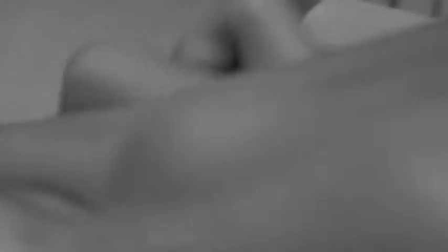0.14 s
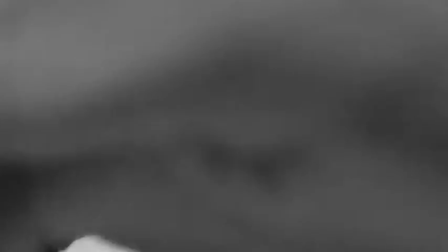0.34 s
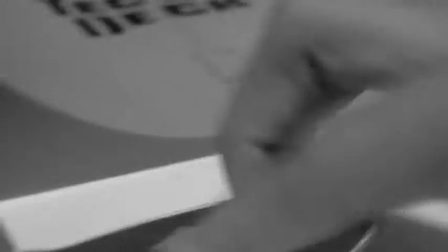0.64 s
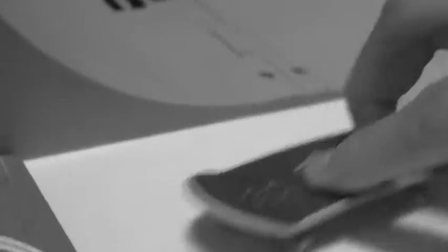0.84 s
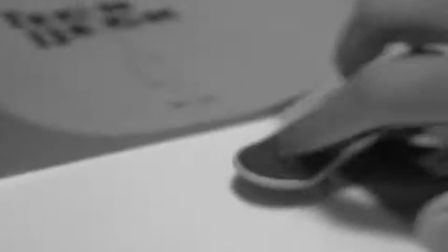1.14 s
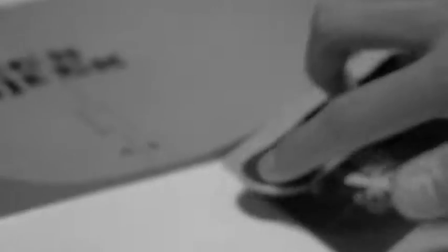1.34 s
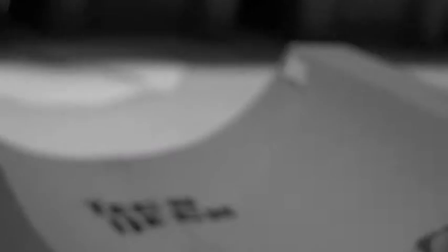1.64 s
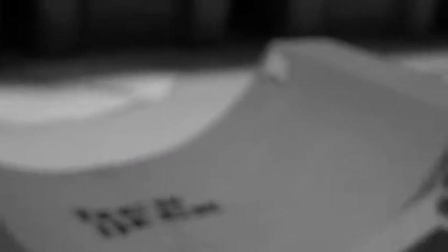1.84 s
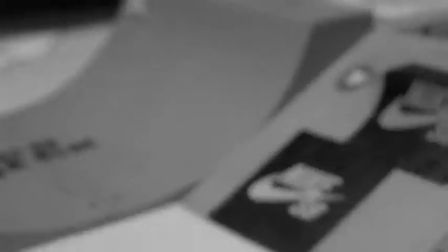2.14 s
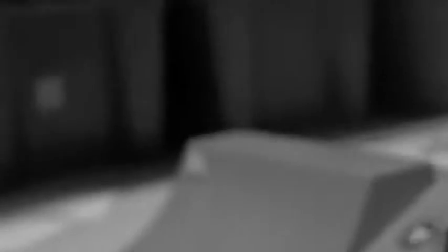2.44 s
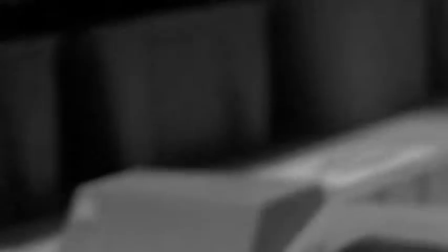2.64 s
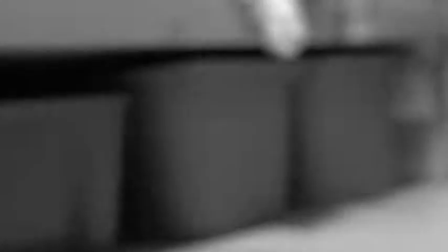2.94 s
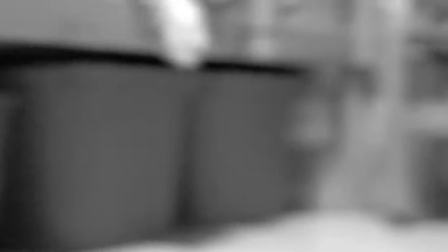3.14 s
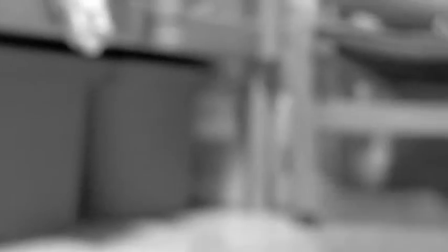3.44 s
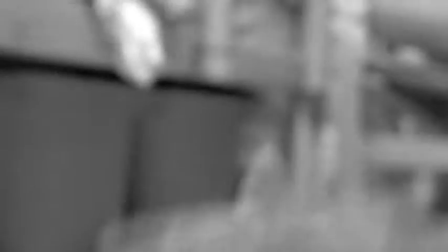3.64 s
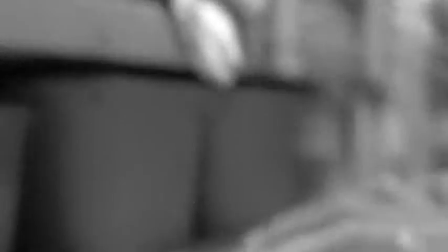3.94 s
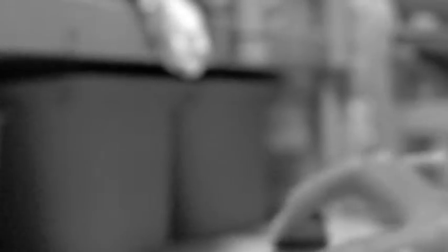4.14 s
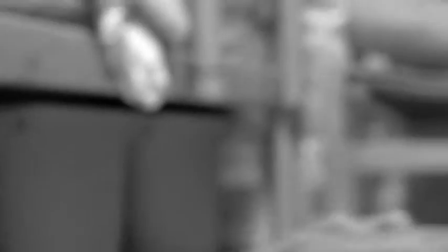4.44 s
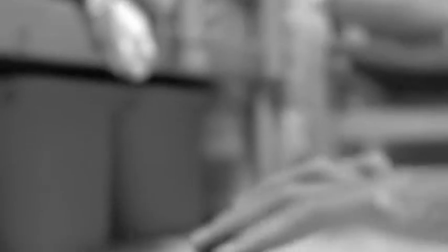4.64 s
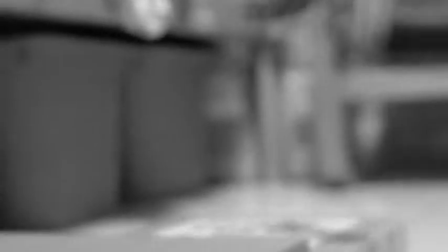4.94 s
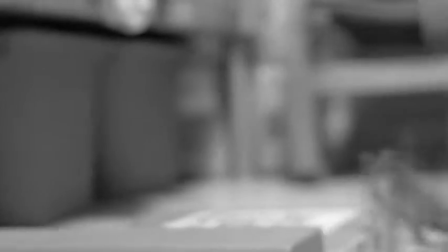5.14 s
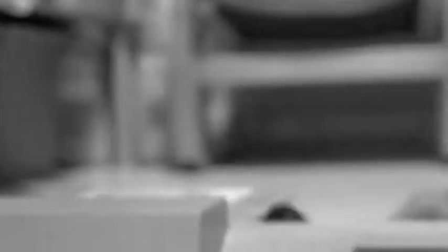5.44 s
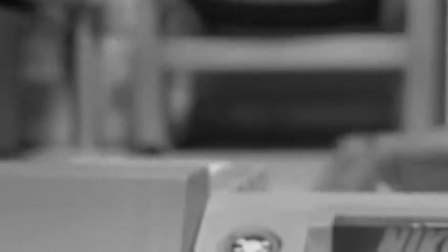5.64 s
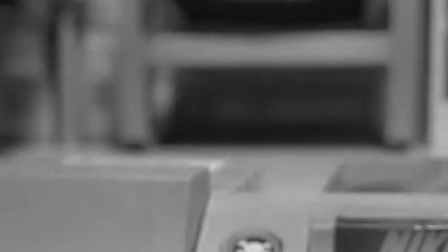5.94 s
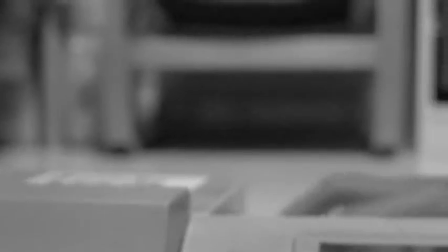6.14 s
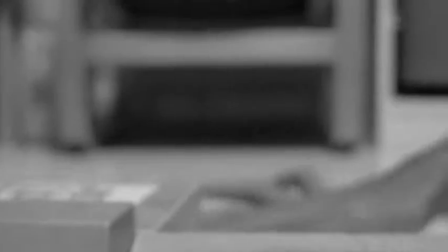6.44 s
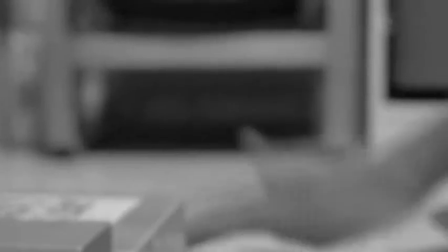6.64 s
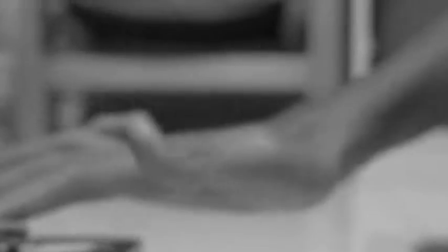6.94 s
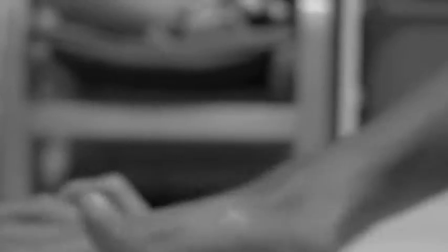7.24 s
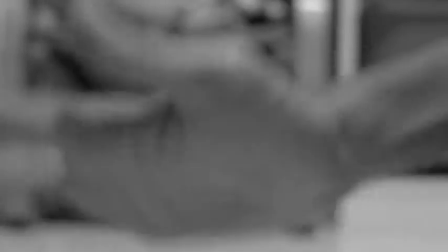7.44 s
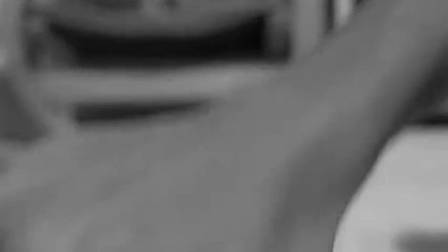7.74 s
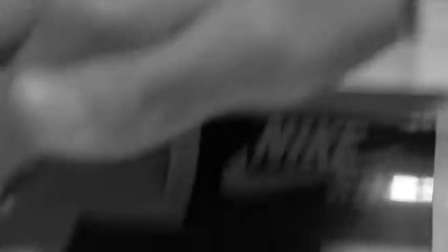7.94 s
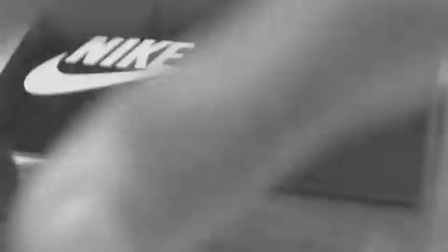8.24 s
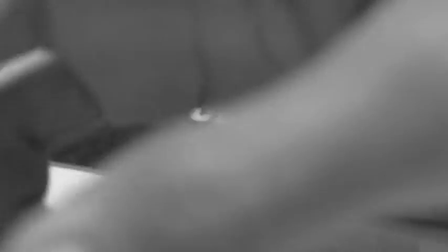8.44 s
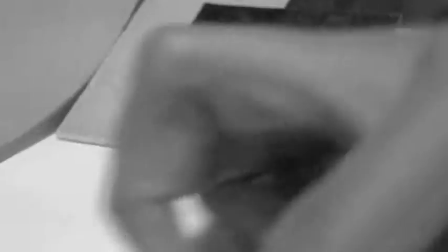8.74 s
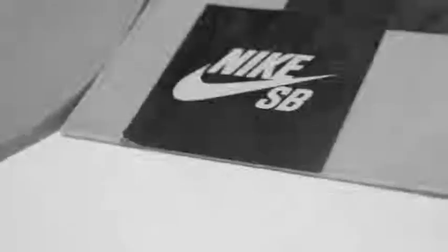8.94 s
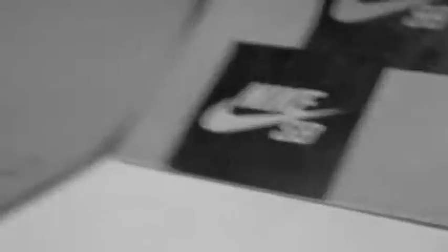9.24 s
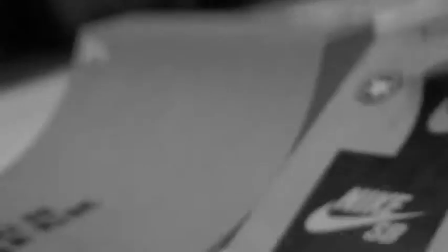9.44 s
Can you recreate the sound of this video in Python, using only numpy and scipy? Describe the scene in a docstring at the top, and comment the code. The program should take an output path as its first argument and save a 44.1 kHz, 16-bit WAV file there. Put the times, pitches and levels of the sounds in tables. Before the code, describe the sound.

A miniature skateboard worked by fingers starts with knocks and a sharp crack, then rolls grittily over a hollow plastic ramp with clicking landings. After a lull, dense hollow clacks come from a box, then another pause, one hard landing, a short roll and a flurry of woody knocks. It thins to faint ticks and rustle. Close stereo pickup, small room, soft low rumble and faint hiss.

```python
"""Fingerboard over ramp and box

A fingerboard rolls and flips over a hollow plastic ramp and a box on a hard floor in a small room.
Wheel bumps and landings excite ringing modes: hollow obstacles, wooden deck and metallic trucks.
Edges crack as short noise bursts and rattle out; skin and sleeve rustle as swelling noise strokes.
Underneath lie hand rumble, house bass with a mains hum, a mid wash and a faint hiss."""
import sys
import numpy as np
from scipy import signal
from scipy.fft import rfft, irfft, next_fast_len
from scipy.io import wavfile

SR = 44100
rng = np.random.default_rng(int(sys.argv[2]) if len(sys.argv) > 2 else 0)


def master_out(mix):
    """Clip the mix to full scale and print it as 16-bit PCM to the path in sys.argv[1]."""
    frames = np.transpose(np.atleast_2d(mix))
    ceiling = np.clip(frames, -1, 1)
    pcm = np.round(ceiling * 32767).astype(np.int16)
    wavfile.write(sys.argv[1], SR, pcm)


N = 423784
TIME = np.arange(N) / SR
PADDED = next_fast_len(N)
BINS_HZ = np.fft.rfftfreq(PADDED, 1 / SR) + 1   # the extra 1 Hz keeps the log axis finite

# Room noise, base level that its layers are set against: (time [s], level [dB])
ROOM_LEVEL = [(0.0, -65), (1.74, -61), (2.11, -55.5), (2.33, -57), (3.32, -53.5), (3.42, -54.5),
              (3.69, -62), (4.63, -57), (5.19, -65.5), (5.49, -65.5), (6.61, -60.5), (6.8, -60),
              (6.93, -63), (7.04, -74), (7.76, -67.5), (8.46, -68), (8.73, -65.5), (9.61, -63)]
BASS_DB, MIDDLE_DB, AIR_DB, AIR_TREBLE_DB, GRIP_DB = 4, 6, -12.5, -6, -12   # against that base
# Spectra of hand rumble, house bass and mid wash: (frequency [Hz], level per Hz [dB])
HANDLING_SPECTRUM = [(15, -45), (28, -18.5), (45, -5.5), (58, -2), (75, -13.5), (110, -34), (200, -75.5)]
BASS_SPECTRUM = [(47, -37), (80, -1.5), (108, -1), (167, -8), (195, 0.5), (222, -5.5), (266, -4.5),
                 (339, -3.5), (450, -19.5), (580, -46.5), (990, -120)]
MIDDLE_SPECTRUM = [(210, -40.5), (350, 0), (460, 2.5), (700, 1.5), (1080, 2), (1400, -2.5), (1800, -3.5),
                   (2050, -10), (2900, -14.5), (3500, -23), (5000, -61.5)]
# Stereo width of room noise and rustle: (frequency [Hz], left-right likeness [-1 to 1])
LIKENESS = [(30, -0.84), (60, -0.85), (150, 0.013), (380, -0.67), (950, 0.4), (2380, 1), (5980, -0.21),
            (15000, 0.12)]
MAINS_HZ, MAINS_DB = 100.3, -8.5   # level against the house bass
# Shifts of the holding hand: (time [s], rumble level [dB])
SHIFTS = [(.96, -73), (2.14, -83), (2.55, -74), (3.15, -74), (4.52, -100), (4.95, -52.5), (5.4, -68),
          (6.02, -84), (6.502, -57.5), (8.699, -70.5), (9.15, -71)]
SHIFT_S = 0.12   # swell and fade
HISS_DB, CUTOFF_HZ = -88, 17000   # microphone self-noise; top cut

# Spectrum of the rustle: (frequency [Hz], level per Hz [dB])
RUSTLE_SPECTRUM = [(1500, -26), (2400, -7), (3200, -3), (4300, 0), (6100, -4), (8000, -6), (10500, -4),
                   (13500, -8), (15800, -13), (16600, -30)]
# Strokes of skin and sleeve: (full from [s], held for [s], level below 6 kHz [dB], level above [dB])
STROKES = [(0, 0.29, -50.5, -82), (0.832, 0.27, -52, -68), (1.432, 0.16, -56, -64.5),
           (2.0, 0.05, -59, -48.5), (2.303, 0.58, -59, -61.5), (3.29, 0.16, -50.5, -43.5),
           (4.343, 0.078, -57.5, -65), (4.745, 0.057, -55.5, -55), (5.301, 0.038, -59.5, -64.5),
           (5.772, 0.48, -59, -58), (6.644, 0.057, -50, -56.5), (7.332, 0.11, -57.5, -60.5),
           (7.83, 0.033, -60.5, -57), (9, 0.39, -81, -66)]
STROKE_RISE_DB_PER_S, STROKE_FALL_DB_PER_S = 154, 97.5
GRAIN_DB = -5   # ticks of grit in the rustle

# Reverb of the small room
ROOM_T60_S, ROOM_DB, ROOM_BASS_HZ, ROOM_TREBLE_HZ = 0.17, -9, 670, 8900

# Blows, relative levels: (time [s], crack below 7 kHz [dB], crack above 7 kHz [dB],
# trucks [dB], deck [dB], hollow obstacle [dB], rattle t60 [s])
BLOWS = [(0.0136, -25, -65, -30, -22, -37, 0.038), (0.144, -33, -57, -52, -51, -23, 0.031),
         (0.165, -26.5, -54, -57, -55, -18, 0.044), (0.3147, -38, -60, -43, -56, -72, 0.059),
         (0.375, -9.5, -14.5, -18.5, -8, -30, 0.027), (0.628, -46, -65, -62, -36.5, -68, 0.039),
         (0.6625, -26, -52, -62, -58, -66, 0.014), (0.6979, -19.5, -13, -41, -26, -72, 0.015),
         (0.804, -40, -73, -63, -64, -66, 0.2), (0.916, -31.5, -60, -61, -65, -61, 0.037),
         (1.014, -24.5, -49, -31, -29, -19.5, 0.037), (1.0241, -32.5, -51, -36, -40, -14.5, 0.13),
         (1.0924, -35, -64, -26, -40, -34, 0.12), (1.2056, -51, -40.5, -31, -34, -24.5, 0.17),
         (1.3156, -25.5, -59, -17.5, -21, -15.5, 0.034), (1.3505, -32, -51, -31, -35, -25.5, 0.036),
         (1.4481, -24, -56, -30, -27, -19, .04), (1.4995, -27.5, -58, -24, -29, -15, 0.074),
         (1.5474, -37, -53, -20, -51, -42, 0.06), (1.7256, -36, -45, -32, -26, -27, 0.044),
         (1.7753, -21, -22, -26, -45, -60, 0.033), (1.8492, -40, -54, -40, -29, -16, 0.077),
         (1.8764, -42, -44, -27, -42, -29, 0.12), (1.9937, -31, -55, -22.5, -39, -18, 0.17),
         (2.0628, -12.5, -8.5, -8, -37, -16, 0.041), (2.1955, -8.5, -11.5, -25, -24.5, -36, 0.045),
         (2.2095, -29, -10.5, -43, -48, -36, 0.045), (2.2244, -17, -45, -47, -39, -46, 0.16),
         (2.239, -31, -6.5, -25, -29, -54, 0.052), (2.384, -40, -42, -43, -54, -52, 0.13),
         (2.9817, -43, -43.5, -53, -49, -62, 0.24), (3.0388, -40.5, -32, -63, -51, -55, 0.11),
         (3.2736, -10.5, -43, -15, -36, -63, 0.019), (3.489, -11, 8, -45, -59, -72, 0.012),
         (3.6562, -12, -9.5, -20, -30, -9, 0.12), (3.6656, -24, -17, -13, -25, -5.5, 0.042),
         (3.7023, -10, -19, -15, -25, -2.5, 0.065), (3.7384, -32.5, -33, -46, -36, -15, 0.13),
         (3.8538, -31.5, -57, -23.5, -49, -30.5, 0.16), (3.9662, -18, -58, -21, -43, -13.5, 0.058),
         (4.171, -46, -64, -34, -42, -31, 0.049), (4.3156, -19, -15, -28, -30, -4, 0.059),
         (4.323, -22.5, -37, -23, -32, -9, 0.16), (4.356, -40, -41, -36, -43, -8, .05),
         (4.3753, -33, -38, -27, -42, -11, 0.071), (4.4431, -32, -66, -66, -51, -41, 0.035),
         (4.501, -38.5, -49, -50, -46, -26.5, 0.13), (4.5794, -41, -50.5, -33, -44, -15.5, 0.12),
         (4.6033, -40, -56, -30.5, -62, -19, 0.054), (4.6925, -20.5, -24, -27, -22, -4, 0.066),
         (4.7097, -27, -45, -24.5, -45, -44, .059), (4.7933, -25, -42, -34, -22, -26, 0.071),
         (4.85, -32, -32, -19, -18, -13, 0.24), (4.8741, -10, -0.5, -13, -39, -10.5, 0.029),
         (5.1622, -7.5, -10.5, -6.5, -6, -6, 0.053), (5.1718, -32, -31, -14, -9, -17, 0.11),
         (5.1928, -13, -31, -5, -17, -5.5, 0.046), (5.218, -22.5, -19, -35, -21, -14, 0.12),
         (5.2839, -22.5, -13, -33, -44, -35, 0.073), (5.303, -20, -20, -33, -33, -17, 0.17),
         (5.5961, -32.5, -40, -21, -42, -25.5, 0.12), (5.699, -30, -20, -21, -32, -34.5, 0.025),
         (5.7805, -19, -19, -47, -46, -36, 0.037), (5.8333, -33, -32, -60, -47, -55, .071),
         (5.863, -22, -35, -33, -49, -63.5, 0.032), (6.7189, -19.5, -8.5, -33, -36, -38.5, 0.048),
         (6.731, -34, -21, -65, -58, -73, 0.16), (6.9197, -8.5, -5.5, -4, -4.5, 0, 0.045),
         (6.9339, -10.5, -30, -14, -22, -3, 0.038), (7.0665, -50.5, -48, -32.5, -34, -43, 0.087),
         (7.2682, -26, -45, -33, -32, -23, 0.081), (7.362, -31, -67, -45, -27, -35, 0.13),
         (7.4288, -45, -57, -40, -48, -51, 0.087), (7.4747, -25, -36, -39, -23, -17, 0.059),
         (7.5941, -22, -37, -21.5, -23, -26, 0.047), (7.69, -10.5, -23, -17.5, -16, -11.5, 0.086),
         (7.7109, -2, -11.5, -50, -17, -8, 0.023), (7.774, -12.5, -37, -18, -26, -31, 0.049),
         (7.8027, -34, -45, -17, -46, -54, 0.021), (7.8422, -10, -29, -20, -2, -45, 0.027),
         (7.87, -19.5, -43, -15, -18, -49, .033), (7.8857, -40, -35, -37, -16, -54, .054),
         (7.979, -16, -53, -26, -19.5, -58, 0.015), (8.0656, -25.5, -58, -22, -19, -72, .017),
         (8.309, -46.5, -62, -48, -56, -77, 0.033), (8.3728, -43, -59, -39, -46.5, -73, 0.03),
         (8.719, -56, -48, -41.5, -46, -79, 0.03), (9.0527, -54.5, -56, -43.5, -38, -42, 0.072),
         (9.0944, -59, -41, -38.5, -70, -60, 0.054), (9.1344, -57, -42.5, -53.5, -45, -49, .05),
         (9.177, -53, -67, -38.5, -57, -61, 0.027), (9.489, -34.5, -36.5, -70, -71, -70, 0.04)]
# Runs of the wheels, one list a run: (time [s], pressure on the wheels as relative level [dB])
RUNS = [
    [(0.0, -17.5), (0.02, -25), (0.036, -33), (0.124, -29.5), (0.144, -30.5), (0.198, -41), (0.206, -46),
     (0.26, -60)],
    [(1.0, -54), (1.016, -22), (1.026, -24.5), (1.09, -35), (1.142, -32), (1.186, -41.5), (1.212, -30),
     (1.3, -55.5)],
    [(1.3, -36), (1.32, -23.5), (1.41, -35), (1.518, -25.5), (1.534, -30), (1.546, -31), (1.696, -29),
     (1.7, -25)],
    [(1.7, -22), (1.732, -25.5), (1.77, -34.5), (2.006, -24), (2.058, -25.5), (2.066, -20.5), (2.138, -43),
     (2.19, -37.5)],
    [(3.2, -52), (3.266, -35.5), (3.274, -33), (3.284, -50), (3.312, -41.5), (3.348, -41), (3.402, -37.5),
     (3.48, -43)],
    [(3.72, -14), (3.76, -38), (3.798, -55), (3.842, -40), (3.87, -27), (3.96, -47)],
    [(3.98, -46), (3.996, -33), (4.06, -42.5), (4.074, -31.5), (4.138, -57), (4.184, -43), (4.208, -50),
     (4.31, -31)],
    [(4.39, -26), (4.42, -29), (4.434, -25), (4.452, -30.5), (4.572, -44.5), (4.58, -28), (4.686, -28.5),
     (4.69, -23)],
    [(4.72, -22), (4.726, -18), (4.796, -14), (4.842, -32), (4.85, -9.5), (4.884, -10.5), (4.894, -38),
     (4.96, -41.5)],
    [(5.22, -23.5), (5.236, -29), (5.29, -38), (5.296, -51), (5.32, -23.5), (5.348, -49), (5.354, -35.5),
     (5.5, -66)],
    [(5.6, -36), (5.68, -52), (5.704, -33), (5.766, -67), (5.782, -40), (5.804, -58), (5.872, -51),
     (5.92, -65)],
    [(6.96, -32), (7.016, -46), (7.058, -70), (7.068, -45.5), (7.132, -42.5), (7.144, -51.5), (7.19, -39),
     (7.23, -77.5)],
    [(7.23, -71), (7.234, -54), (7.278, -37), (7.286, -36.5), (7.35, -25), (7.448, -49.5), (7.478, -29),
     (7.58, -83)],
    [(7.72, -27), (7.734, -33), (7.768, -43), (7.778, -45), (7.836, -61), (7.84, -29.5)],
    [(7.88, -41), (7.888, -32), (7.956, -58), (7.982, -22.5), (8.062, -45), (8.068, -32), (8.082, -53.5),
     (8.16, -75)],
]
# What sounds in each run, against its pressure: (box [dB], ramp [dB], deck buzz [dB], truck rasp [dB])
RUN_COLOUR = [(-4.5, -2.5, -8, -13), (-3, -1, -4, -11), (-12, -1, -10.5, -9), (-14, 1, -13.5, -11),
              (-13, -13.5, -8, -0.5), (-0.5, -3.5, -14, -16), (1, -6, -16, -16), (0, -21, -15, -21.5),
              (-6.5, -12, -19.5, -15.5), (-2, -4.5, -29, -7.5), (-9.5, -7.5, -19, -8.5),
              (-3, -5.5, -29.5, -24.5), (-3.5, -2.5, -11.5, -12), (3.5, -1.5, -9, -15.5),
              (-30.5, -23, 2, -17)]
# While blows land on the box, not the ramp: (from [s], to [s])
ON_BOX = [(3.66, 5.0), (6.8, 6.93), (7.0, 7.55)]
# Where the board is in the stereo field: (time [s], left over right [dB])
PLACE = [(0, -2.5), (.38, 9.5), (.6, -1), (1.5, -2.5), (2.3, -1.5), (3.27, 5), (3.49, -5), (3.66, 1.5),
         (4.0, -1), (5.2, -2), (6.7, 0), (6.95, 3), (7.7, 2.5), (8.1, 7), (8.7, -4), (9.1, -8), (9.61, -1)]
# Ringing modes of each body: (frequency [Hz], relative level [dB], t60 [s])
RAMP_MODES = [(248, 1.5, 0.015), (395.3, -4.5, 0.07), (440, -2.5, 0.064), (506.7, -3.5, 0.081),
              (527, 0, 0.043), (626.5, 0, 0.052), (743, -28.5, 0.15)]
BOX_MODES = [(250, -10, 0.082), (338, -13, 0.15), (388.1, 1.5, 0.061), (434.4, -2, 0.065),
             (476.7, -10.5, 0.13), (540.6, -6, 0.065), (704, -14.5, 0.13)]
DECK_MODES = [(723, -2.5, 0.024), (861, -4.5, 0.035), (921, -8, 0.061), (991, -5.5, 0.046),
              (1092, -8.5, 0.035), (1204, 2.5, .006)]
TRUCK_MODES = [(1152, -10.5, 0.029), (1417.6, -4.5, 0.034), (1710, -3.5, 0.022), (1970, 2.5, 0.0073),
               (2283, -1.5, 0.018), (2730, -5, 0.007), (3580, -6.5, 0.0043), (4290, -5, 0.0073)]
# Surface under the obstacles: (frequency [Hz], relative level [dB], t60 [s])
TABLE_MODES = [(150.4, -7.5, 0.036), (207.4, 0, 0.0607), (288, 2, 0.08)]
TABLE_DB = -22   # against the hollow obstacle
# A soft, lower hollow knock: (frequency [Hz], relative level [dB], t60 [s])
THUMP_MODES = [(353, 2.5, 0.12), (678, -7.5, 0.051), (1020, -13, 0.045)]
THUMP_S, THUMP_DB = 9.575, -24
# Air under the ramp and in the box: (frequency [Hz], width [Hz])
RAMP_CAVITY = (575, 340)
BOX_CAVITY = (415, 190)
SMALL_BODY_HZ = 214   # below this the little objects hardly radiate
WHEEL_TURNS_PER_S = 42   # centre of a wandering speed

# Spectrum of the edge cracks: (frequency [Hz], level per Hz [dB])
CRACK_SPECTRUM = [(900, -41), (1800, -3.5), (3000, -0.5), (4400, 1), (6500, -2.5), (9500, -1), (13000, -1),
                  (15500, -3.5), (16500, -36)]
SNAP_T60_S = 0.0045
RATTLE_DB, RATTLE_DB_PER_OCTAVE = -8.5, 2   # against the crack at t60 50 ms; longer rattles start stronger
EDGE_SCATTER_DB = 3.0   # each edge faces the two sides a little differently
PORT_LAG = 0.24   # delay of the farther side [samples per dB of pan]


def amp(db):
    """Gain of a level in dB."""
    return 10 ** (np.asarray(db) / 20)


def rms_one(x):
    """Scale to rms 1."""
    return x / np.sqrt(np.mean(x ** 2) + 1e-20)


def in_time(rows):
    """Draw the second column of a curve, sample by sample."""
    s, value = np.transpose(rows)
    return np.interp(TIME, s, value)


def at_hz(points, hz):
    """Read a spectrum on a log frequency axis."""
    points_hz, value = np.transpose(points)
    return np.interp(np.log(hz), np.log(points_hz), value)


def coloured(x, spectrum, share=1):
    """Give noise or clicks a smooth spectrum."""
    gain = amp(at_hz(spectrum, BINS_HZ)) * share
    return irfft(rfft(x, PADDED) * gain, PADDED)[..., :N]


def drift(rate_hz):
    """Slow random wander of spread 1: lowpassed noise, made at a twentieth of the sample rate."""
    r = np.exp(-40 * np.pi * rate_hz / SR)
    noise = rng.standard_normal(N // 20 + 2002)
    slow = signal.lfilter([1], [1, -2 * r, r * r], noise)[2000:]
    return np.interp(np.arange(N) / 20, np.arange(len(slow)), rms_one(slow))


def grains(per_s, spread_db):
    """Random clicks of uneven size and sign, rms 1."""
    sizes = amp(spread_db * np.minimum(rng.exponential(1, N), 4))
    sizes *= rng.choice([-1, 1], N)
    return rms_one(sizes * (rng.random(N) < per_s / SR))


def panned(x, pan_db):
    """Left and right of one source."""
    return np.array([x * amp(pan_db / 2), x * amp(-pan_db / 2)])


def filtered(x, order, edge_hz, kind):
    """Butterworth filter."""
    return signal.sosfilt(signal.butter(order, edge_hz, kind, fs=SR, output="sos"), x)


def halves(x, split_hz):
    """Low and high part, rms 1 each; the inverted high part avoids a notch where they meet."""
    low, high = filtered(x, 2, split_hz, "low"), filtered(x, 2, split_hz, "high")
    return rms_one(low), -rms_one(high)


def wide_noise(spectrum, roughness_db):
    """Stereo noise whose likeness follows pitch; its mid part has rms 1 before the level flickers."""
    alike = np.clip(at_hz(LIKENESS, BINS_HZ), -.99, .99)
    share = np.sqrt([1 + alike, 1 - alike])
    mid, side = coloured(rng.standard_normal((2, N)), spectrum, share)
    flicker = amp(roughness_db * drift(15))
    return np.array([mid + side, mid - side]) * flicker / np.sqrt(np.mean(mid ** 2))


def ring(force, hz, t60):
    """Two-pole resonator: a unit click sets a sine of about height 1 ringing and dying."""
    r, w = amp(-60 / (t60 * SR)), 2 * np.pi * hz / SR
    return signal.lfilter([0, np.sin(w)], [1, -2 * r * np.cos(w), r * r], force + 1e-18)


def cavity(x, hz, width_hz):
    """A broad air resonance, gain 1 on top: the thump swells over a few cycles."""
    r = np.exp(-np.pi * width_hz / SR)
    feedback = [1, -2 * r * np.cos(2 * np.pi * hz / SR), r * r]
    return signal.lfilter(np.array([1, 0, -1]) * (1 - r * r) / 2, feedback, x + 1e-18)


def struck(modes, level_db, contact_s, scatter_db):
    """Every blow pushes each mode with a strength of its own; a longer contact is a softer push."""
    at = (np.array(BLOWS)[:, 0] * SR).astype(int)
    share = amp(np.array(modes)[:, 1])
    luck = amp(scatter_db * rng.standard_normal((len(at), len(modes))))
    # the colour varies from blow to blow, the strength stays
    luck *= np.sqrt(np.sum(share ** 2) / np.sum((share * luck) ** 2, axis=1, keepdims=True))
    out = np.zeros(N)
    for k, (hz, db, t60) in enumerate(modes):
        force = np.zeros(N)
        force[at] = amp(level_db + db) * luck[:, k] * (-1) ** k
        out += ring(force, hz, t60)
    push = np.hanning(int(contact_s * SR) + 3)
    return np.convolve(out, push / push.sum())[:N]


def rolled(modes, force, steady_force):
    """Wheel bumps through the modes of a body, scaled so that the steady force gives rms 1."""
    both = np.array([force, steady_force])
    out, steady = sum(amp(db) * ring(both, hz, t60) * (-1) ** k
                      for k, (hz, db, t60) in enumerate(modes))
    return out / np.sqrt(np.mean(steady ** 2))


def room_noise():
    """Lumpy rumble of the holding hand, house bass with a mains hum, and a mid wash."""
    room_db = in_time(ROOM_LEVEL)
    hum = amp(MAINS_DB + 3.0 * drift(4)) * np.sin(2 * np.pi * MAINS_HZ * TIME)
    bass = (wide_noise(BASS_SPECTRUM, roughness_db=0.5) + hum) * amp(room_db + BASS_DB)
    grip = amp(room_db + GRIP_DB)
    for s, db in SHIFTS:
        grip += amp(db) * np.exp(-((TIME - s) / SHIFT_S) ** 2)
    rumble = wide_noise(HANDLING_SPECTRUM, roughness_db=3.0) * grip
    middle = wide_noise(MIDDLE_SPECTRUM, roughness_db=1.15) * amp(room_db + MIDDLE_DB)
    return rumble + bass + middle


def room(x):
    """Dense reflections, unlike in each ear, starting after a few milliseconds; weak in bass and top."""
    t = np.arange(int(.5 * SR)) / SR
    fade = amp(-60 * t / ROOM_T60_S) * np.clip(t / 0.0028 - .5, 0, 1)
    echo = filtered(rng.standard_normal((2, len(t))) * fade, 1, [ROOM_BASS_HZ, ROOM_TREBLE_HZ], "band")
    echo *= amp(ROOM_DB) / np.sqrt(np.sum(echo ** 2, axis=1, keepdims=True))
    return signal.fftconvolve(x[None], echo, axes=1)[:, :N]


def rustle():
    """Skin and sleeve slide over grip tape and floor, noise with gritty ticks; a faint room hiss below."""
    ticks = rms_one(coloured(grains(250, spread_db=4.5), RUSTLE_SPECTRUM))
    slide = wide_noise(RUSTLE_SPECTRUM, roughness_db=1.5) + amp(GRAIN_DB) * ticks
    low, high = halves(slide, 6000)
    room_db = in_time(ROOM_LEVEL)
    low_gain, high_gain = amp(room_db + AIR_DB), amp(room_db + AIR_TREBLE_DB)
    for s, length, low_db, high_db in STROKES:
        rise_db = (TIME - s) * STROKE_RISE_DB_PER_S
        fall_db = (s + length - TIME) * STROKE_FALL_DB_PER_S
        shape = amp(np.minimum(0, np.minimum(rise_db, fall_db)))
        low_gain += amp(low_db) * shape
        high_gain += amp(high_db) * shape
    return low * low_gain + high * high_gain


def runs():
    """Gain of each rolling layer (box, ramp, deck, trucks); silent between runs."""
    total = np.zeros((4, N))
    for run, colour_db in zip(RUNS, RUN_COLOUR):
        s, pressure_db = np.transpose(run)
        total += np.outer(amp(colour_db), amp(np.interp(TIME, s, pressure_db, -200, -200)))
    return total


def flat_spots():
    """One bump a wheel turn, at a wandering speed; rms 1."""
    speed = WHEEL_TURNS_PER_S * amp(1.2 * drift(5.6))
    turns = np.floor(np.cumsum(speed) / SR)
    return rms_one(np.diff(turns, prepend=0) * amp(2.1 * rng.standard_normal(N)))


def jangle(level_db):
    """Envelope of the loose chatter that follows each blow: a quick swell, then a decay."""
    out, after = np.zeros(N), np.arange(int(.2 * SR)) / SR
    for (s, *_, t60), db in zip(BLOWS, level_db):
        i = int(s * SR)
        chatter = amp(db - 60 * after / t60) * np.minimum(after / 0.0036, 1)
        out[i:i + len(after)] += chatter[:N - i]
    return out


def table_thud():
    """The surface under the obstacles answers each blow with low, short modes."""
    hollow_db = np.array(BLOWS)[:, 5]
    return struck(TABLE_MODES, hollow_db + TABLE_DB, .002, scatter_db=2.5)


def hollow_thump():
    """One click rings a few hollow modes, each swelling through an air resonance."""
    knock = amp(THUMP_DB) * (np.arange(N) == int(THUMP_S * SR))
    return sum(cavity(ring(knock * amp(db), hz, t60), hz, 96) for hz, db, t60 in THUMP_MODES)


def obstacles(box_gain, ramp_gain):
    """Hollow ramp and box, struck and rolled on, each heard through the resonance of its air."""
    s, hollow_db = np.array(BLOWS)[:, 0], np.array(BLOWS)[:, 5]
    on_box = sum((s > start) & (s < end) for start, end in ON_BOX) > 0
    # out-of-round wheels bump in lumps
    bumps = grains(700, spread_db=2.5) * amp(4.5 * drift(9))
    ramp = struck(RAMP_MODES, np.where(on_box, -200, hollow_db - 4.5), 0.00071, scatter_db=5.5)
    ramp += rolled(RAMP_MODES, bumps * ramp_gain * amp(0.5), bumps)
    knocks = 1.1 * bumps + flat_spots()
    box = struck(BOX_MODES, np.where(on_box, hollow_db - 1.0, -200), 0.001, scatter_db=5.5)
    box += rolled(BOX_MODES, knocks * box_gain, knocks)
    return cavity(ramp, *RAMP_CAVITY) + cavity(box, *BOX_CAVITY)


def deck_and_trucks(deck_gain, rasp_gain):
    """Wooden deck and trucks ring from blows, from the grit under the wheels and from loose chatter."""
    trucks_db, deck_db = np.array(BLOWS)[:, 3], np.array(BLOWS)[:, 4]
    grit = grains(1400, spread_db=1.5) * amp(3.3 * drift(6.7))
    trucks = struck(TRUCK_MODES, trucks_db - 8.5, 0.00028, scatter_db=4.5)
    rasp = rasp_gain * amp(-5.5) + jangle(trucks_db - 8.5)
    trucks += rolled(TRUCK_MODES, grit * rasp, grit)
    deck = struck(DECK_MODES, deck_db - 9.0, 0.00054, scatter_db=7.0)
    buzz = deck_gain * amp(-7.5) + jangle(deck_db - 10.5)
    deck += rolled(DECK_MODES, grit * buzz, grit)
    return trucks + deck


def bodies():
    """All ringing bodies; the little ones lose their bass, the surface below keeps it."""
    box_gain, ramp_gain, deck_gain, rasp_gain = runs()
    small = obstacles(box_gain, ramp_gain) + deck_and_trucks(deck_gain, rasp_gain) + hollow_thump()
    return filtered(small, 2, SMALL_BODY_HZ, "high") + table_thud()


def cracks():
    """Each edge snaps in milliseconds, then the loose board rattles out; the nearer side hears it first."""
    noise = halves(coloured(rng.standard_normal(N), CRACK_SPECTRUM), 7000)
    rattle = halves(coloured(grains(2500, spread_db=3.0), CRACK_SPECTRUM), 7000)
    out, after = np.zeros((2, N + 99)), np.arange(int(.2 * SR)) / SR
    snap = amp(-60 * after / SNAP_T60_S) * np.minimum(after / 0.00025, 1)
    place_db = in_time(PLACE)
    for (s, low_db, high_db, *_, t60), facing in zip(BLOWS, rng.standard_normal(len(BLOWS))):
        i = int(s * SR)
        n = min(len(after), N - i)
        pan_db = place_db[i] + EDGE_SCATTER_DB * facing
        rattle_db = RATTLE_DB + RATTLE_DB_PER_OCTAVE * np.log2(t60 / .05)
        dying = amp(rattle_db - 60 * after / t60) * np.minimum(after / 0.0014, 1)
        burst = np.zeros(n)
        for db, hiss, clicks in zip((low_db, high_db), noise, rattle):
            burst += amp(db - 3.0) * (snap[:n] * hiss[i:i + n] + dying[:n] * clicks[i:i + n])
        for ear, x, lead_db in zip(out, panned(burst, pan_db), (pan_db, -pan_db)):
            late = i + max(round(-PORT_LAG * lead_db), 0)
            ear[late:late + n] += x
    return out[:, :N]


def scene():
    """Board and obstacles close by, with their reflections, over rustle and room noise."""
    board = panned(bodies(), 0.75 * in_time(PLACE)) + cracks()
    return room_noise() + rustle() + room(board.mean(axis=0)) + board


def record(dry):
    """Faint microphone self-noise; peaks beyond 0.97 clip, then the top is cut steeply."""
    noisy = dry + amp(HISS_DB) * rng.standard_normal((2, N))
    top_cut = signal.cheby2(18, 90, CUTOFF_HZ, fs=SR, output="sos")
    return signal.sosfilt(top_cut, np.clip(noisy, -.97, .97))


dry = scene()
out = record(dry)
master_out(out)
```